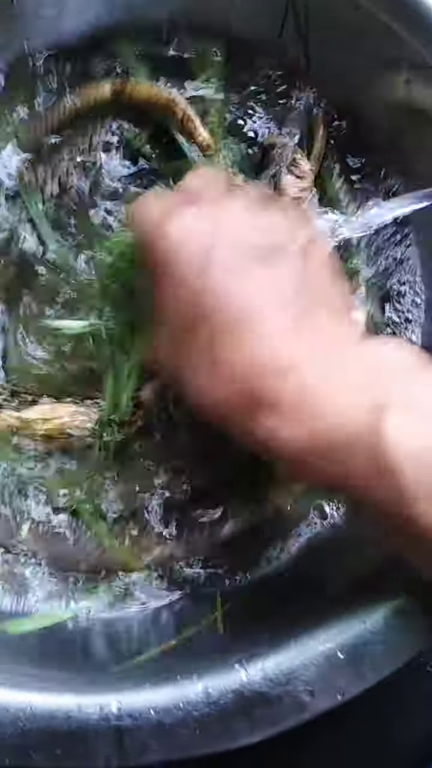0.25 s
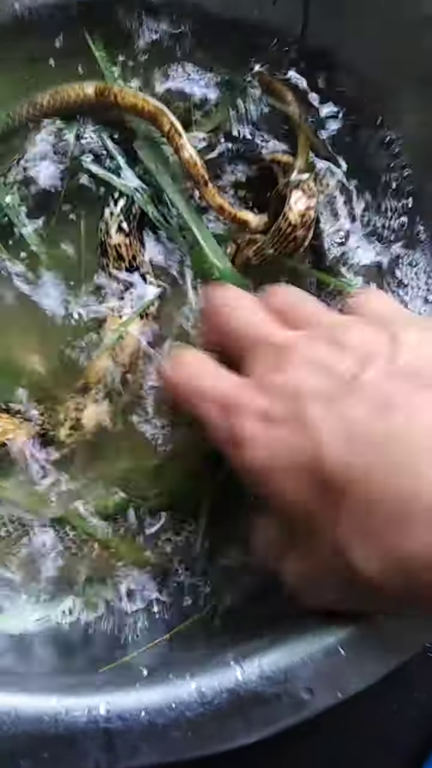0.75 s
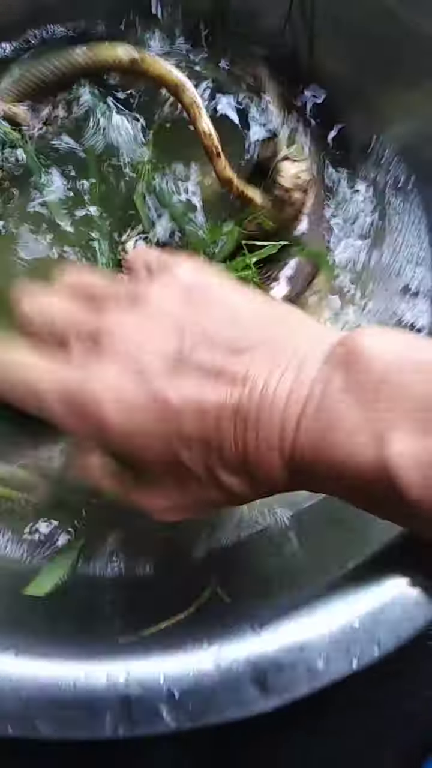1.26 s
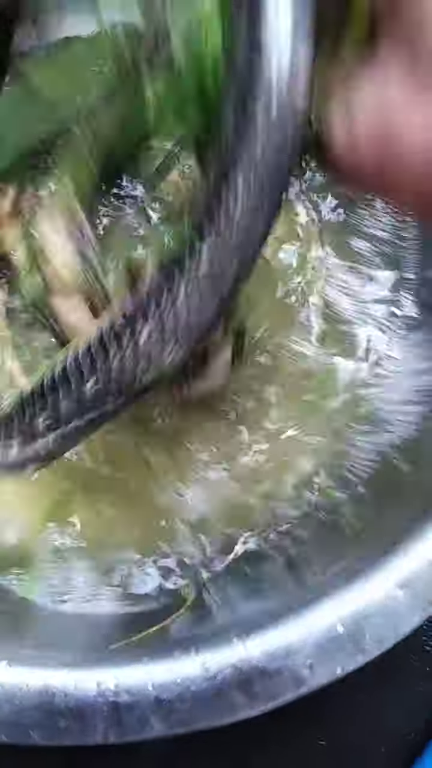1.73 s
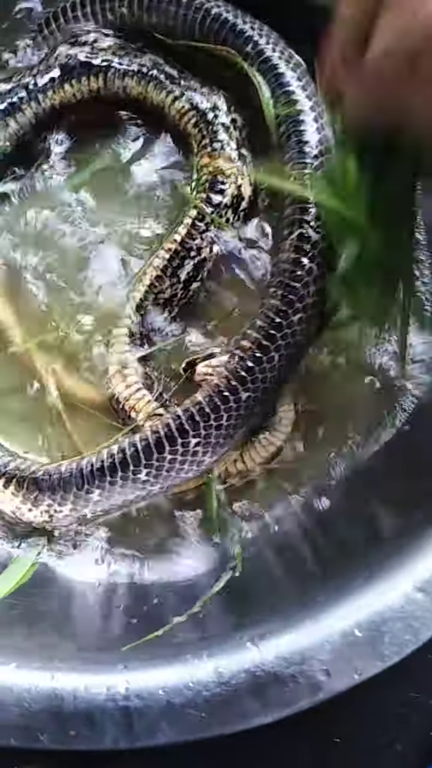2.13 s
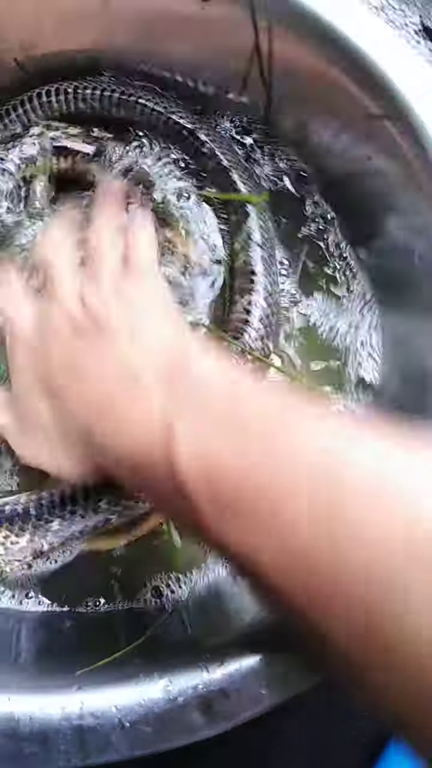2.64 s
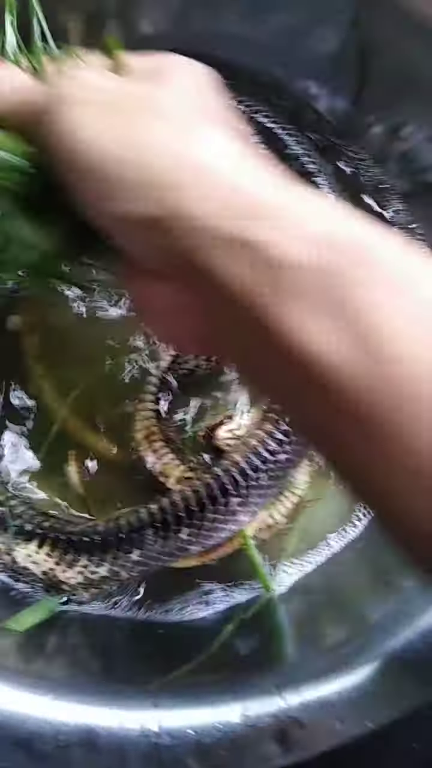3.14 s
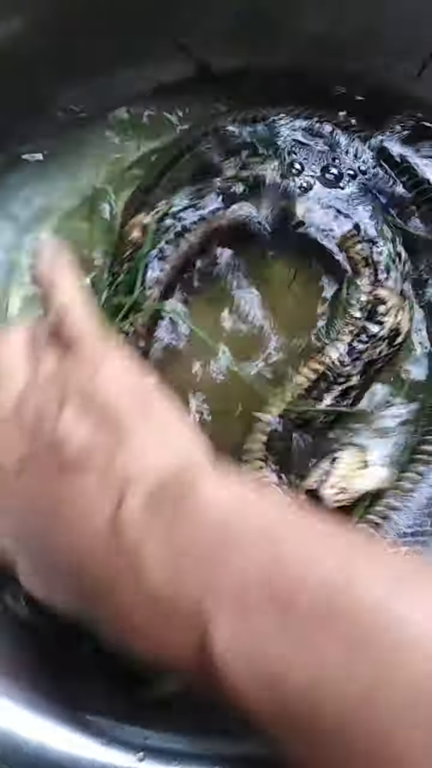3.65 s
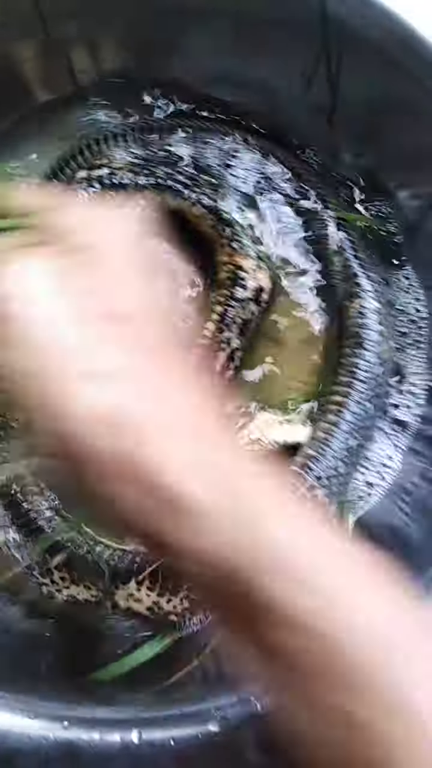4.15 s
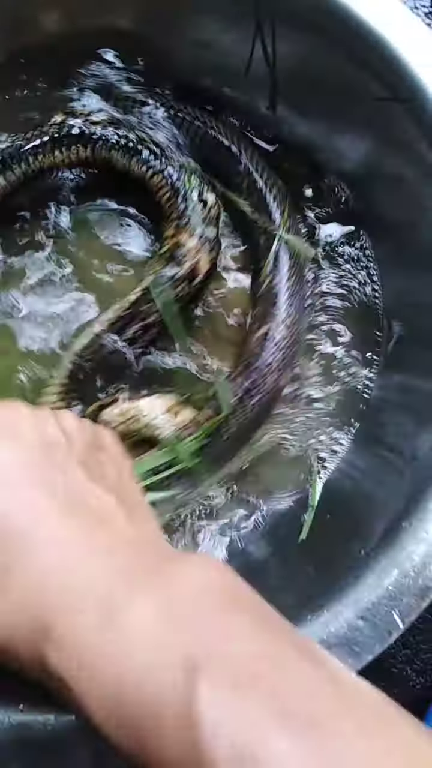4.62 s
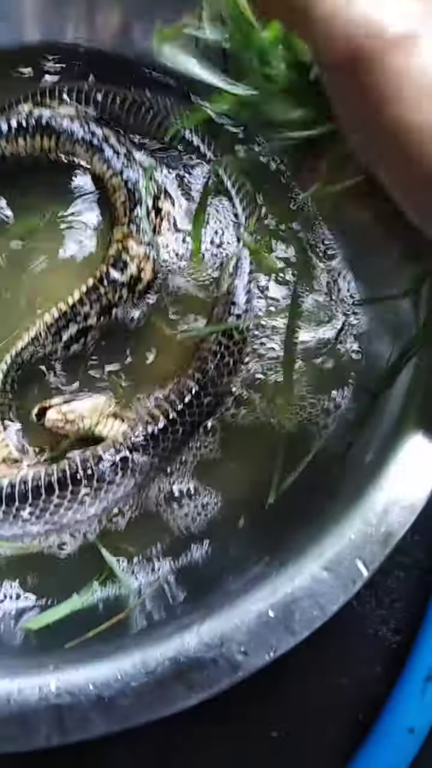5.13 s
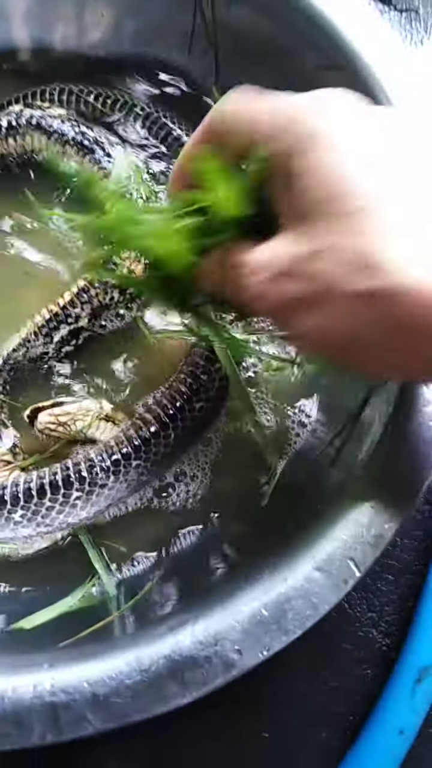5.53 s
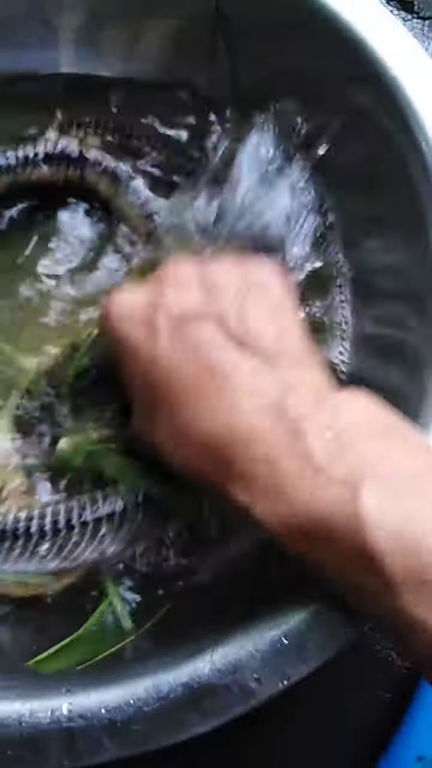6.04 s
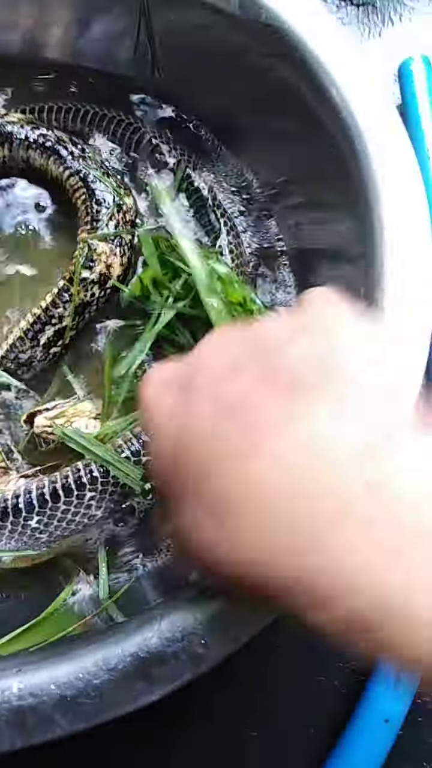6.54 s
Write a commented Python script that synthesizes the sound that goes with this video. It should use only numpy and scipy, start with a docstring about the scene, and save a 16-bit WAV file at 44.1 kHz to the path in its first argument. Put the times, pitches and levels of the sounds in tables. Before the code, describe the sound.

Close splashing, bubbling and squeaky scrubbing of wet skin with grass in a metal basin, while an engine hums and a vehicle passes.

```python
"""A hand scrubs wet coils with a tuft of grass in a steel basin of water, close under a phone.
From the start an engine drones nearby while the stirred water fizzes, splats and bubbles. At 1 s wet
skin sticks and slips in two squeaks, and the biggest splash follows at 1.8 s. Around 4 s a vehicle
rumbles and whines past and the skin squeaks again. Then the grass whistles over wet skin and rustles.
At 6.6 s the rim is knocked once and the basin rings."""
import sys
import numpy as np
from scipy import signal
from scipy.fft import rfft, irfft, next_fast_len
from scipy.io import wavfile
from scipy.ndimage import uniform_filter1d, map_coordinates

SR = 44100
rng = np.random.default_rng(int(sys.argv[2]) if len(sys.argv) > 2 else 0)


def materialize(psi):
    """Save the field psi as 16-bit PCM at rate SR to the path in sys.argv[1].

    A 1-D psi becomes a single channel; in a 2-D psi each row is a channel.
    """
    bounded = np.clip(np.atleast_2d(psi).T, -1, 1)
    quanta = np.round(bounded * 32767).astype(np.int16)
    wavfile.write(sys.argv[1], SR, quanta)


N = 298998
TOP_HZ = 14400  # upper edge of the sound

# How loud the traffic is: time_s, engine_rumble_db, vehicle_db
TRAFFIC = [(0, -38.5, -58), (1.7, -41, -51), (2.45, -37.5, -59), (2.9, -41, -45.5), (3.5, -39, -35),
           (3.95, -39, -30), (4.3, -43, -36), (4.6, -46.5, -52), (5.3, -44.5, -68), (6.78, -40.5, -65)]


def amp(db):
    """Turn decibels into a gain to multiply by."""
    return 10 ** (np.asarray(db) / 20)


def unit(x):
    """Scale x to an average (rms) level of 1."""
    return x / np.sqrt(np.mean(x ** 2) + 1e-20)


def along(points, hz):
    """Read a table of (pitch, value) rows at hz, on a log pitch scale."""
    pitches, values = np.transpose(points)
    return np.interp(np.log(hz + 1), np.log(pitches + 1), values)


def curves(rows):
    """Join rows of (time, values...) with straight lines: one curve per value column."""
    times, *columns = np.transpose(rows)
    return [np.interp(np.arange(N) / SR, times, column) for column in columns]


def wobble(rate, size=N):
    """A smooth curve through `rate` random points a second."""
    at = np.arange(0, size + 8, 8)
    points = rng.standard_normal(int(size * rate / SR) + 4)
    return np.interp(np.arange(size), at, map_coordinates(points, [at * rate / SR]))


def filtered(x, response):
    """Change the level and phase of each frequency in x by response(hz)."""
    size = next_fast_len(N + SR // 4)
    return irfft(rfft(x, size) * response(np.fft.rfftfreq(size, 1 / SR)), size)[..., :N]


def rush(spectrum, patchy_db):
    """Stereo noise with random louder and softer patches; left and right are alike only in the bass."""
    # How alike the two sides are: pitch_hz, likeness (1 = the same)
    alike = [(60, 0.94), (200, 0.91), (350, 0.83), (620, 0.44), (1400, 0.11)]
    grid = signal.stft(rng.standard_normal((2, N)), nperseg=256)[2]
    patches = uniform_filter1d(uniform_filter1d(rng.standard_normal(grid.shape[1:]), 6, 0), 6, 1)
    pair = signal.istft(grid * amp(patchy_db * unit(patches)), nperseg=256)[1][:, :N]
    angle = lambda hz: np.arccos(along(alike, hz)) / 2
    colour = lambda hz: amp(along(spectrum, hz)) * [np.cos(angle(hz)), np.sin(angle(hz))]
    mid, side = filtered(pair, colour)
    return unit(np.array([mid + side, mid - side]))


def engine():
    """Unsteady tones at multiples of the firing rate, over a rumble; the exhaust favours its own pitch."""
    # The main tone, at three times the firing rate: time_s, pitch_hz, level_db
    drone = [(0, 114, -46.5), (.22, 114.2, -32.5), (1.45, 114, -35), (1.7, 113, -42.5),
             (1.95, 112.5, -40.5), (2.17, 112.5, -32), (2.45, 112, -35), (2.68, 110, -44), (3.04, 109, -37),
             (3.4, 106.5, -39.5), (3.7, 105.3, -30), (4.05, 104, -36.5), (4.55, 102, -44.5),
             (4.9, 102.5, -38), (5.5, 101.7, -29), (6.1, 102, -41.5), (6.78, 103, -39)]
    # The other tones: multiple of the firing rate, level_db relative to the rumble
    overtones = [(2, -1), (2.5, -13), (4, -1.5), (5, 0)]
    # Tone colour of the rumble: pitch_hz, level_db
    rumble = [(15, -64), (25, -25), (43, -29), (77, -7.5), (108, -4.5), (190, -14), (320, -27.5),
              (420, -46), (550, -95), (920, -120)]
    pipe_hz, pipe_db_per_octave = 166, 42.5
    drone_hz, drone_db = curves(drone)
    rumble_db, _ = curves(TRAFFIC)
    firing_hz = drone_hz / 3
    phase = 2 * np.pi * np.cumsum(firing_hz) / SR
    tone = np.sqrt(2) * amp(drone_db + 0.81 * wobble(16)) * np.sin(3 * phase + 0.11 * wobble(8.9))
    for multiple, db in overtones:
        pipe_db = -pipe_db_per_octave * np.abs(np.log2(multiple * firing_hz / pipe_hz))
        gain = amp(rumble_db + db + np.maximum(pipe_db, -14) + 4.2 * wobble(3.96))
        tone += gain * np.sin(multiple * phase + 1.3 * wobble(8))
    return tone + amp(rumble_db) * rush(rumble, patchy_db=2.5)


def passing_vehicle():
    """Low road noise that swells and fades as a vehicle goes by."""
    # Tone colour of the road noise: pitch_hz, level_db
    road = [(76, -45), (130, -8), (200, -0.5), (548, -16), (728, -16), (879, -20.5), (1060, -27.5),
            (1600, -27), (2080, -72), (3520, -120)]
    _, vehicle_db = curves(TRAFFIC)
    return amp(vehicle_db) * rush(road, patchy_db=1.0)


def gear_whines():
    """The vehicle's gears give short tones that waver differently on the left and right."""
    # One whine a row: start_s, end_s, pitch_hz, level_db
    whines = [(3.4, 3.56, 1080, -47), (3.87, 3.95, 1090, -44), (3.93, 4.035, 1210, -39),
              (4.25, 4.47, 1120, -49)]
    out = np.zeros((2, N))
    for start, end, hz, db in whines:
        t = np.arange(round((end - start) * SR)) / SR
        fade = np.clip(np.minimum(t, end - start - t) / 0.0052, 0, 1)
        for side in out:
            gain = fade * amp(db + 3 * wobble(25, len(t)))
            tone = np.sin(2 * np.pi * hz * t + 1.3 * wobble(40, len(t)))
            side[round(start * SR):][:len(t)] += gain * tone
    return out


def grass_rustles():
    """The wet tuft whispers all the time and rustles in soft swells of high noise."""
    # One rustle a row: start_s, length_s, level_db
    rustles = [(4.89, 0.16, -36), (5.18, 0.11, -44), (5.37, 0.14, -42.5), (5.526, 0.05, -44.5)]
    # Tone colour of the grass blades: pitch_hz, level_db
    blades = [(4000, -32), (7000, -4), (10000, -2.5), (14300, -8.5)]
    gain = np.full(N, amp(-54.5))  # the steady whisper
    for start, length, db in rustles:
        swell = np.hanning(round(length * SR))
        gain[round(start * SR):][:len(swell)] += amp(db) * swell
    return gain * amp(1.2 * wobble(60)) * rush(blades, patchy_db=-2.5)


def grass_whistles():
    """Grass drawn over wet skin whistles through three pitches; a wider band sounds more like a swish."""
    # One whistle a row: start_s, length_s, first_hz, middle_hz, last_hz, level_db, width_hz
    whistles = [(4.457, 0.028, 5480, 5320, 5040, -21.5, 250), (4.548, 0.011, 5960, 6200, 6400, -23, 150),
                (4.65, 0.16, 5530, 2900, 2176, -43.5, 400), (4.676, 0.023, 3900, 3850, 3900, -44, 120),
                (4.815, 0.18, 2200, 1930, 1840, -41, 129), (4.899, .28, 3550, 3305, 3496, -44, 800),
                (6.662, 0.076, 4300, 5080, 4000, -32, 550), (6.745, 0.036, 3300, 3800, 4250, -52, 300)]
    out = np.zeros(N + SR)
    for start, length, first_hz, middle_hz, last_hz, db, width_hz in whistles:
        u = np.linspace(-1, 1, round(length * SR))  # -1 at the start, 1 at the end
        hz = middle_hz * (first_hz / middle_hz) ** (u * (u - 1) / 2)
        hz *= (last_hz / middle_hz) ** (u * (u + 1) / 2)
        wander = np.sqrt(2 * np.pi * width_hz / SR) * rng.standard_normal(len(u))
        phase = np.cumsum(2 * np.pi * hz / SR + uniform_filter1d(wander, size=24))
        level_db = db - 10 * np.abs(u) ** 3.4 + 3 * wobble(127, len(u))  # flat middle, softer ends
        tone = np.sin(phase) + amp(-27) * np.sin(2 * phase)
        out[round(start * SR):][:len(u)] += amp(level_db) * tone
    return out[:N]


def skin_squeaks():
    """Wet skin sticks and slips, faster and rougher as it goes, and sets a hollow ringing."""
    # One squeak a row: start_s, length_s, first_hz, last_hz, grip (share of the length before
    # the pitch climbs), level_db, colour_shift_octaves
    squeaks = [(0.967, 0.041, 1011, 1090, 0.3, -16.5, -0.034),
               (0.995, 0.038, 1159, 1420, 0.039, -13.5, -0.048),
               (3.741, .048, 777, 1208, 0.086, -22, -1.04)]
    # Tone colour of the skin: pitch_hz, level_db
    skin = [(700, -39), (1050, -14.5), (2000, -16), (2400, 4), (3000, -15), (3900, -13.5), (5100, 4),
            (6200, 0.5), (7500, -8), (11000, -20), (15000, -47)]
    rise_s, fall_s, growth_db, flicker_db = 0.0057, 0.0035, 2.5, 3
    hollow_hz, width_hz, hollow_db = 1012, 12, 7.5
    multiples = np.arange(1, 13)[:, None]
    out = np.zeros(N)
    for start, length, first_hz, last_hz, grip, db, shift in squeaks:
        size = round(length * SR)
        progress = np.linspace(0, 1, size)
        climb = np.clip((progress - grip) / (1 - grip), 0, 1)
        hz = first_hz * (last_hz / first_hz) ** np.sin(climb * np.pi / 2) ** 1.5
        rough = np.linspace(0.14, 0.55, size)
        phase = 2 * np.pi * np.cumsum(hz * (1 + 0.048 * rough * wobble(430, size))) / SR
        flicker = np.array([wobble(182, size) for _ in multiples])
        colour = amp(along(skin, multiples * hz / 2 ** shift) + flicker_db * flicker)
        overtones = np.sin(multiples * phase + 6 * rng.random(multiples.shape))
        tone = unit(np.sum(colour * (multiples * hz < TOP_HZ) * overtones, 0))
        fade = np.clip(length * np.minimum(progress / rise_s, (1 - progress) / fall_s), 0, 1) ** 2
        gain = fade * amp(db + growth_db * progress + 2.2 * wobble(180, size))
        rasp = 1 - rough + 1.2 * rough * uniform_filter1d(rng.standard_normal(size), size=9)
        out[round(start * SR):][:size] += gain * tone * rasp
    hollow = lambda hz: 1j * hz * width_hz / (hollow_hz ** 2 - hz ** 2 + 1j * hz * width_hz)
    return out + amp(hollow_db) * filtered(out, hollow)


def rim_knock():
    """A dull bump and a brief high clink, then low ringing that wavers with the moving water."""
    # The basin's ringing tones: pitch_hz, level_db, ring_s (time to fall by 60 dB)
    basin_tones = [(513, -13.5, 0.34), (790, -11, 0.28), (1150, -16, 0.63), (1370, -7.5, 0.99),
                   (1480, -12, .8), (1631, -22, 1.7), (2720, -12, 0.34), (1870, -20, 0.46),
                   (1010, -19, 0.78)]
    knock_s, knock_db = 6.568, -26
    low_hz, high_hz, clink_s = 4350, 7460, 0.14
    at = round(knock_s * SR)
    t = np.arange(N - at) / SR
    ring = np.zeros(len(t))
    for hz, db, ring_s in basin_tones:
        swell = 1 - np.exp(-t / (0.08 * ring_s ** 2))  # long tones build up slowly
        decay = amp(db - 60 * t / ring_s + 1.7 * wobble(62, len(t)))
        waver = (hz / 2600) ** 2 * wobble(157, len(t))
        ring += swell * decay * np.sin(2 * np.pi * hz * t + waver)
    place, softness, phase = rng.random((40, 3)).T[:, :, None]  # 40 high tones make the clink
    clink_hz = low_hz + (high_hz - low_hz) * place ** 2
    clink_db = -12 * softness - 60 * t * clink_hz / (low_hz * clink_s)  # higher ones die sooner
    clink = np.sum(amp(clink_db) * np.sin(2 * np.pi * (clink_hz * t + phase)), 0)
    bump = amp(-5 - 60 * t / 0.021) * np.sin(2 * np.pi * 430 * t)
    return np.pad(amp(knock_db) * (bump + amp(-8) * clink + amp(-5.5) * ring), (at, 0))


def bubbles(start_s, gain, hz, cycles, rise, size):
    """Each bubble is a dying tone, `size` samples long, whose pitch climbs as it nears the surface."""
    turns = hz[:, None] * np.arange(size) / SR
    age = turns / cycles[:, None]
    tone = np.sin(2 * np.pi * turns * (1 + rise * np.minimum(age, 2)))
    envelope = gain[:, None] * np.exp(-3 * age) * (1 - np.exp(-turns * 1.8))
    at = (start_s * SR).astype(int)[:, None] + np.arange(size)
    return np.bincount(at.ravel(), (envelope * tone).ravel(), N + size)[:N]


def swarm(count, centre_hz, octaves, cycles, spread_db, tilt, size):
    """Many random bubbles in clusters, a few much louder than the rest; tilt favours the high ones."""
    when, strength = rng.random((count, 2)).T
    pitch_spread, life_spread = rng.standard_normal((count, 2)).T
    hz = np.clip(centre_hz * 2 ** (octaves * pitch_spread), 500, 14000)
    level_db = spread_db * np.minimum(-np.log(1 - strength), 3)
    crowding = np.cumsum(amp(4.5 * wobble(14)))  # more bubbles start where this climbs fast
    start_s = np.interp(when, crowding / crowding[-1], np.arange(N) / SR)
    life = cycles * 2 ** (0.5 * life_spread)
    gain = amp(level_db) * hz ** tilt / np.sqrt(life)
    return unit(bubbles(start_s, gain, hz, life, rise=0.087, size=size))


def plops():
    """Single bubbles that ring out above the rest."""
    # One bubble a row: start_s, level_db, pitch_hz, life_cycles
    single_bubbles = [(.13, -21, 1450, 5), (.179, -22.5, 1800, 6.8), (.301, -15, 1440, 3.4),
                      (.412, -27, 593, 3.9), (.423, -21, 1320, 6.6), (.436, -19, 2060, 8),
                      (0.439, -25.5, 1000, 9), (0.4755, -15.5, 3150, 7), (.506, -22, 1233, 13),
                      (0.5804, -20, 3860, 7.5), (0.6386, -20.5, 3200, 9.1), (0.664, -19, 4950, 9),
                      (.675, -26, 2780, 8), (.703, -21.5, 1730, 9.4), (0.7473, -22.5, 2700, 10),
                      (.76, -21, 2920, 8), (0.77, -26, 1290, 6), (1.073, -19, 406, 2.5),
                      (1.533, -25, 1050, 10), (1.594, -14, 1190, 2.8), (1.634, -16, 2390, 4.1),
                      (1.691, -29, 1330, 9.8), (1.72, -20.5, 2300, 7.5), (1.731, -21, 1960, 8.8),
                      (1.818, -16.5, 715, 2.2), (1.952, -14, 890, 13), (1.99, -21, 920, 7),
                      (1.994, -18, 1410, 7.6), (2.033, -18.5, 1970, 8.5), (2.17, -24, 3850, 8),
                      (2.481, -30, 3700, 15), (2.593, -21.5, 3120, 12), (2.695, -21.5, 1650, 6.2),
                      (2.715, -19, 1380, 4.5), (2.82, -20.5, 810, 4.4), (2.861, -23.5, 740, 6.2),
                      (2.872, -26, 3520, 16), (2.93, -26, 1440, 9.6), (2.9911, -25, 3100, 8.7),
                      (3.107, -16, 3750, 4.8), (3.536, -12, 2190, 9.9), (3.555, -23, 1425, 7.7),
                      (4.023, -21.5, 1050, 7.4), (4.366, -23, 2430, 9.1), (4.528, -27, 1300, 8.1),
                      (5.838, -23.5, 1250, 6.1), (5.964, -16, 1580, 6.9), (6.013, -22.5, 1030, 10),
                      (6.035, -16.5, 1320, 4), (6.099, -15.5, 900, 8.6), (6.341, -31.5, 825, 21)]
    start_s, db, hz, cycles = np.transpose(single_bubbles)
    return bubbles(start_s, amp(db), hz, cycles, rise=0.052, size=3072)


def splats():
    """Water hits skin and steel in lumpy bursts of noise: a swell, a smack and a trailing spray."""
    # One splat a row: time_s, level_db, pitch_hz
    hits = [(0.103, -19.5, 3520), (.179, -26, 2800), (.2936, -26, 3180), (.406, -29, 6750),
            (0.424, -25, 2490), (0.523, -26, 10800), (0.703, -29.5, 4000), (1.074, -31, 2000),
            (1.5318, -21.5, 3970), (1.571, -17.5, 8950), (1.6035, -26, 3730), (1.663, -23.5, 7000),
            (1.718, -27, 7200), (1.828, -8.5, 11300), (1.842, -16, 6840), (1.8558, -8, 6900),
            (1.8913, -8.5, 5400), (1.928, -16.5, 3200), (1.9835, -19.5, 3060), (2.001, -17, 2900),
            (2.0325, -22, 2600), (2.221, -21, 4620), (2.5702, -16, 6500), (2.5749, -17, 11200),
            (2.622, -23, 9100), (2.647, -28, 7190), (2.6913, -20.5, 7600), (2.696, -21, 10800),
            (2.7098, -13.5, 5800), (2.8567, -23.5, 3600), (3.215, -25.5, 6800), (3.2865, -24.5, 3470),
            (3.536, -29, 2500), (3.544, -16.5, 3470), (4.3882, -27.5, 4740), (4.869, -25.5, 9500),
            (5.776, -22, 7200), (5.788, -16.5, 4670), (5.9078, -26, 2850), (6.003, -23.5, 4930),
            (6.015, -25, 4740), (6.0615, -23.5, 6500), (6.186, -26, 4400), (6.2081, -21, 3400),
            (6.265, -18.5, 6560), (6.338, -26.5, 5900), (6.501, -32.5, 5800), (6.569, -16.5, 5900)]
    # Tone colour of the spray: pitch_hz, level_db
    spray = [(500, -16.5), (1200, -14.5), (2500, -5), (5000, 1.5), (9000, -0.5), (14300, -7)]
    size, lead = 4096, 512  # samples in a splat, and how many come before the smack
    t, hz = (np.arange(size) - lead) / SR, np.fft.rfftfreq(size, 1 / SR)
    after = np.maximum(t, 0)
    swell = amp(-21 + 60 * t / 0.034)
    attack = 1 - 0.98 * np.exp(-after / 0.00064)
    smack, trail = amp(-60 * after / 0.026), amp(-18 - 60 * after / 0.19)
    envelope = np.where(t < 0, swell, attack * (smack + trail))
    out = np.zeros((2, N + SR))
    for time_s, db, pitch_hz in hits:
        peak = 0.49 + 1.87 / (1 + ((hz - pitch_hz) / (0.12 * pitch_hz)) ** 2)
        noise = unit(irfft(rfft(rng.standard_normal((2, size))) * amp(along(spray, hz)) * peak))
        lumps = amp(3.7 * np.repeat(rng.standard_normal(size // 32), 32))
        out[:, round(time_s * SR):][:, :size] += amp(db) * envelope * lumps * noise
    return out[:, lead:N + lead]


def water_gains():
    """How strong the fizz and slosh are: stirring, plus splashes that jump up, hold and die away."""
    # The hand stirs the water: time_s, fizz_db, slosh_db
    stirring = [(0, -31.5, -41), (.12, -39.5, -40.5), (.172, -45.5, -45.5), (.28, -38, -40),
                (.72, -39, -42.5), (.84, -48, -55.5), (1.3, -46.5, -45.5), (1.42, -42, -52),
                (1.6, -48, -40), (1.79, -37.5, -46), (2.2, -39, -49.5), (2.3, -51.5, -54.5),
                (2.42, -54.5, -72), (2.55, -40.5, -84), (2.635, -39, -39), (2.68, -39, -37),
                (3.15, -43, -45.5), (3.45, -36.5, -39.5), (4.0, -36.5, -36), (4.4, -40, -44),
                (4.75, -40.5, -59.5), (5.2, -44.5, -61.5), (5.74, -49.5, -78), (5.85, -41.5, -38.5),
                (6.3, -41, -48), (6.38, -53.5, -55.5), (6.55, -66.5, -62), (6.63, -49.5, -49),
                (6.78, -35, -47.5)]
    # Hand, grass or coils plunge in: start_s, length_s, fizz_db, slosh_db
    splashes = [(0.192, 0.054, -39, -40.5), (0.412, 0.057, -37.5, -40), (1.029, 0.12, -46.5, -41),
                (1.713, 0.019, -41, -36.5), (1.829, 0.072, -21.5, -28), (1.93, 0.1, -34, -37.5),
                (2.563, 0.088, -39.5, -48.5), (3.211, 0.18, -36, -44.5), (3.522, 0.06, -33.5, -36.5),
                (3.998, 0.055, -33.5, -34), (4.893, 0.2, -38, -48.5), (5.773, 0.046, -30.5, -37),
                (6.006, 0.031, -34, -35), (6.569, 0.014, -41, -41)]
    rise_s, fall_db_per_s = 0.016, 516
    t = np.arange(N) / SR
    power = amp(curves(stirring)) ** 2
    for start, length, *levels_db in splashes:
        span = slice(round((start - rise_s) * SR), round((start + length + 0.2) * SR))
        rise = np.clip((t[span] - start) / rise_s + 1, 0, 1)
        fall_db = fall_db_per_s * np.maximum(t[span] - start - length, 0)
        power[:, span] += (rise * amp(np.subtract.outer(levels_db, fall_db))) ** 2
    return np.sqrt(power)


def stirred_water():
    """Stirring makes a wide wash of noise and close crackling, gurgling drops; returns the two apart."""
    # How much of the water breaks into drops: time_s, level_db
    dripping = [(0, -3), (.8, -3.5), (1.2, -9), (1.5, 1), (1.81, -3), (1.83, -19), (1.92, -2.5), (1.95, -4),
                (2.26, -6), (2.32, -15), (2.55, -17), (2.6, -2), (3.05, -4), (3.4, -12.5), (5.7, -11),
                (5.8, -3), (6.78, -4)]
    # Tone colour of the high fizz: pitch_hz, level_db
    fizz_colour = [(1300, -51), (1900, -22.5), (3300, -3), (4600, -2.5), (6800, 1.5), (9800, -6),
                   (14300, -14)]
    # Tone colour of the lower slosh: pitch_hz, level_db
    slosh_colour = [(260, -33), (450, -21.5), (802, -4), (900, -7), (1150, -8), (1770, -3), (2020, -3.5),
                    (4500, -3.5), (5850, -6.5), (9900, -120)]
    fizz, slosh = water_gains()
    drops = amp(curves(dripping)[0])
    surge = wobble(35) * drops ** 1.56  # more drops, more uneven level
    fizz *= amp(3.5 * surge + 1.06 * wobble(110))
    slosh *= amp(4.1 * surge + 0.54 * wobble(30))
    wash = fizz * rush(fizz_colour, patchy_db=2.0) + slosh * rush(slosh_colour, patchy_db=1.8)
    crackle = swarm(count=3200, centre_hz=6050, octaves=0.69, cycles=4.7, spread_db=5.5, tilt=0.21,
                    size=128)
    gurgle = swarm(count=2000, centre_hz=1700, octaves=0.897, cycles=7.7, spread_db=5.0, tilt=0.63,
                   size=560)
    return amp(-2.5 * drops) * wash, drops * (amp(-0.7) * fizz * crackle + amp(-2.5) * slosh * gurgle)


def basin_echoes(inside, above):
    """Close sounds reach the left side later and echo off the steel; those above the water echo less."""
    # Delay on the left from each spot in the basin: multiple of lag_s
    spot_lags = [.55, .85, 1, 1.1, 1.3]
    # Extra phase delay that the basin adds on the left: pitch_hz, phase_radians
    extra_phase = [(250, 0.39), (600, 1), (1150, 0.57), (2000, -1.56), (3000, -0.021)]
    lag_s, left = 11 / SR, np.array([[1], [0]])
    t = np.arange(4096) / SR
    decay = amp(-60 * t / 0.026) + amp(-20 - 60 * t / 0.36)
    out = filtered(above, lambda hz: np.exp(-2j * np.pi * hz * lag_s * left))
    step = 1500  # samples between random changes in which spot is sounding
    weights = rng.standard_normal((len(spot_lags), N // step + 1)) ** 4
    for lag, share in zip(spot_lags, weights / weights.sum(0)):
        share = np.interp(np.arange(N) / step, np.arange(len(share)), share)
        tail = rng.standard_normal((2, len(t))) * decay
        tail /= np.linalg.norm(tail, axis=1)[:, None]
        source = (inside + amp(-8) * above) * np.sqrt(share)
        echo = signal.oaconvolve(source[None], tail, axes=1)[:, :N]
        phase = lambda hz: along(extra_phase, hz) + 2 * np.pi * hz * lag * lag_s
        direct = filtered(inside * share, lambda hz: np.exp(-1j * phase(hz) * left))
        out += amp(2) * (direct + echo)
    return out


def scene():
    """Traffic behind, scrubbing in the basin in front."""
    wash, drops = stirred_water()
    traffic = engine() + passing_vehicle() + gear_whines()
    scrubbing = wash + grass_rustles() + splats()
    close = basin_echoes(inside=drops + plops() + rim_knock(), above=skin_squeaks() + grass_whistles())
    return traffic + scrubbing + close


def record(dry):
    """The phone's left microphone is duller than its right, and both cut off above TOP_HZ."""
    # How the two microphones differ: pitch_hz, left_minus_right_db
    balance = [(700, 0), (1300, -3), (2400, -4.5), (4400, 0), (6600, 2.5), (8100, -1.5), (10000, -11.5),
               (14500, -14)]
    sides = np.array([[0.5], [-0.5]])
    return filtered(dry, lambda hz: amp(along(balance, hz) * sides) / (1 + (hz / TOP_HZ) ** 120))


dry = scene()
out = record(dry)
materialize(out)
```